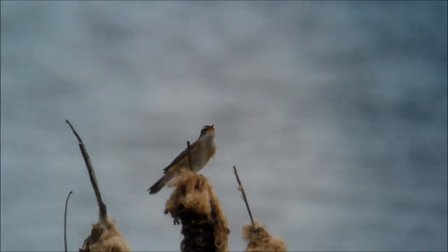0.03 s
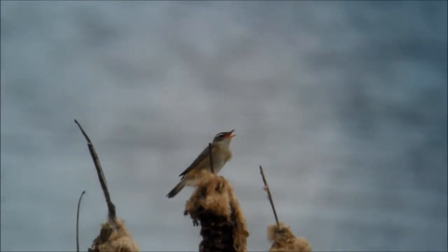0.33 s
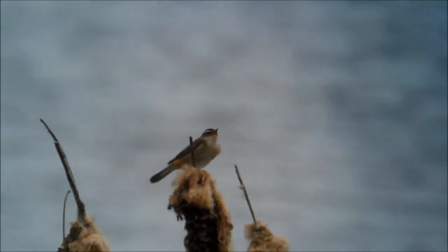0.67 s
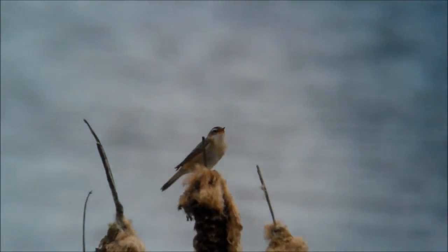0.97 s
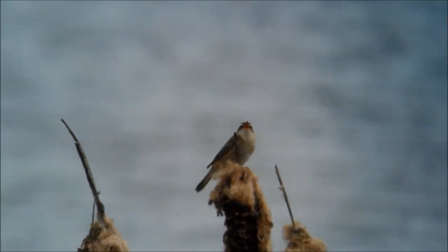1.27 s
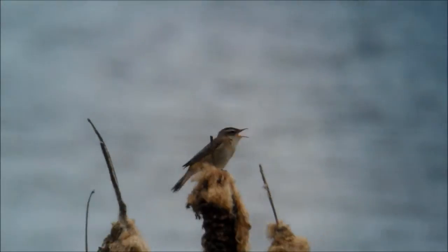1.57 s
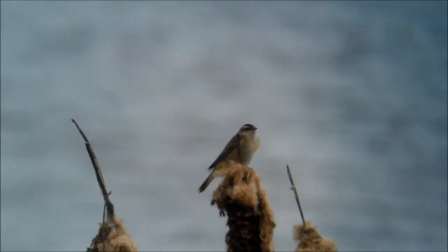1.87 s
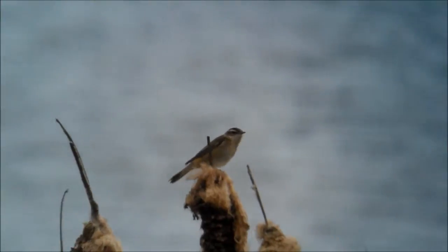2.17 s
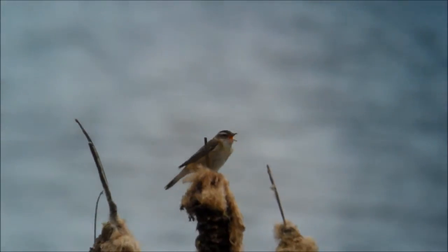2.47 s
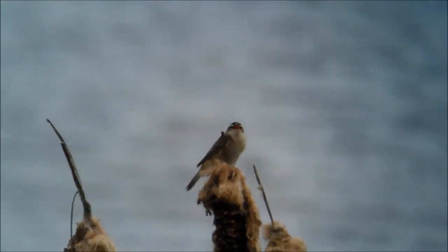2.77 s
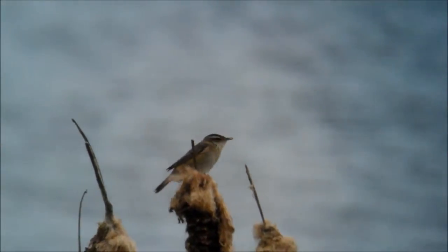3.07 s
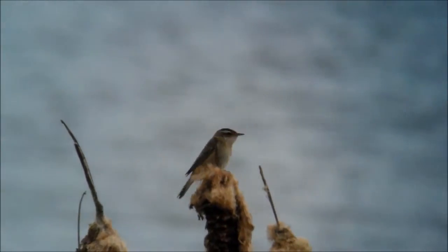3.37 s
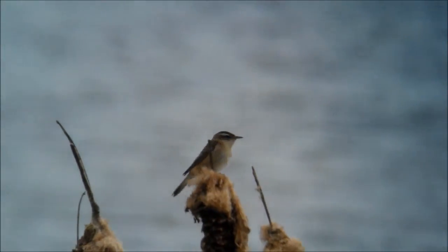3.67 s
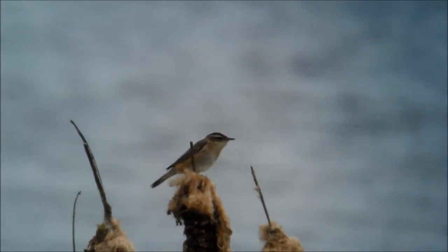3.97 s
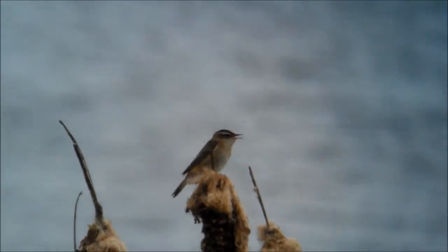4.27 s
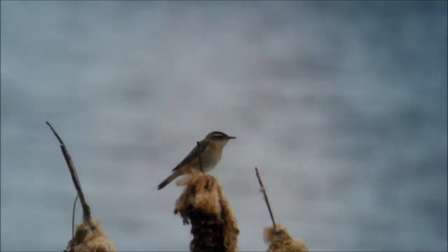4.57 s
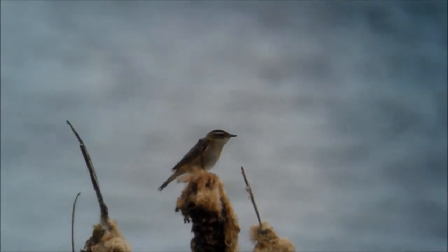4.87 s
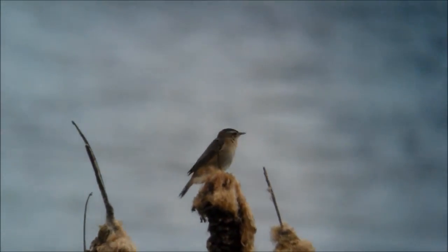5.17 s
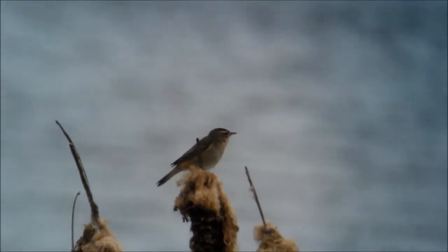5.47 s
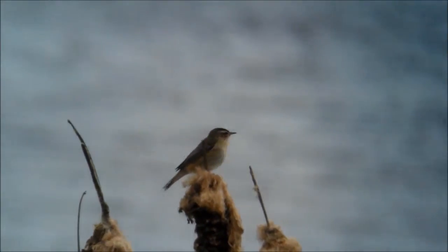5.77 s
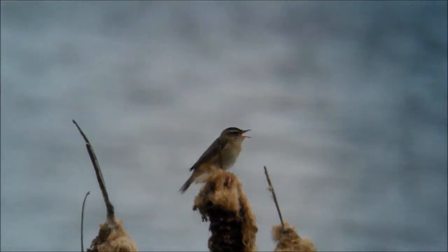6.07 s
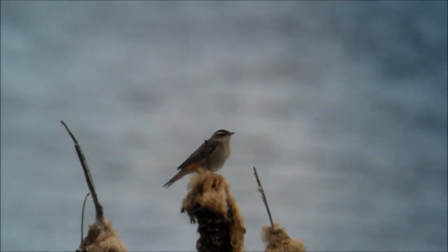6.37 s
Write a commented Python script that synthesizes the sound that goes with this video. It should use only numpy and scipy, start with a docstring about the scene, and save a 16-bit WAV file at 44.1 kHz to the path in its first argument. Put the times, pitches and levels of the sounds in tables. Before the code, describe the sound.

Outdoors by the water, a soft rush and microphone hiss run throughout, dipping for an instant now and then. A quick, distant trill opens, and a small bird in the reeds sings faint, raspy chips in quick groups. Two close, dull handling thumps stand out, followed by a light rub. The bird carries on, with a hoarse cry and lower calls far away, pauses, and chirps again near the end.

```python
"""Warbler in the reeds

A small warbler chatters faintly from a reed head over water: its syrinx gives scratchy chips in threes,
each set in a thin, buzzy slur. Further off are a quick trill, an arching cry and a few lower calls,
over a distant rush and microphone hiss that keep dipping for an instant.
Right at the microphone, a hand bumps the camera twice, then rubs and taps it lightly."""
import sys
import numpy as np
from scipy import signal
from scipy.fft import rfft, irfft
from scipy.io import wavfile
from scipy.ndimage import map_coordinates

SR = 44100
rng = np.random.default_rng(int(sys.argv[2]) if len(sys.argv) > 2 else 0)


def output_pcm(signal):
    """Save a mono or channel-first signal as 16-bit PCM at the path in sys.argv[1].

    Samples are clipped to [-1, 1] before scaling.
    """
    pcm = np.clip(np.atleast_2d(signal).T, -1, 1) * 32767
    wavfile.write(sys.argv[1], SR, np.round(pcm).astype(np.int16))


N = 283122

# the warbler's three-chip syllables: middle chip t/s, lowest throat resonance f/Hz, relative level/dB,
# upper resonances against the lowest/dB, swell per chip/dB
SYLLABLES = [(.680, 4790, -54.5, -5, 1.5), (.856, 4700, -56, -8, -5), (1.052, 4740, -55, -2.5, 3),
             (1.259, 4700, -57, -2, 1.5), (1.429, 4700, -61, -2.5, 4), (1.604, 4780, -56.5, -3.5, 2.5),
             (1.798, 4730, -62, -1.5, -4), (1.949, 4720, -60, -0.5, -3.5), (2.639, 4970, -55.5, 2.5, -1),
             (2.852, 4980, -59.5, 5, -1.5), (3.083, 5170, -61.5, 1, -3.5), (3.316, 5220, -59.5, 3, -2),
             (4.169, 5440, -62.5, 0, -0.5), (4.572, 4782, -60.5, -4, 1), (6.168, 4800, -65.5, 4, 0),
             (6.408, 4920, -67, 8, 3)]


def warbler_chips(length=.02, gap_s=.026, rise_share=.48, arch=.071, outer_db=-2.5, gain_db=-4.6):
    """Arching bursts of the syrinx: a ringing core under raspy resonances that an open bill lets out."""
    out, size = np.zeros(N), int(length * SR)
    shape = np.sin(np.pi / 2 * np.interp(np.arange(size) / size, [0, rise_share, 1], [0, 1, 0]))
    for s, hz, db, upper_db, swell_db in SYLLABLES:
        # pitch ratio, level/dB, pitch scatter
        resonances = [(1, 0, .033 * (1 + undb(upper_db))),
                      (1.13, upper_db, .0968), (1.37, upper_db - 5.5, .0968)]
        for place in (-1, 0, 1):
            chip_hz = hz * (1 + .022 * rng.standard_normal())  # no two chips quite alike
            burst = np.zeros(size)
            for ratio, part_db, scatter in resonances:
                pitch = chip_hz * ratio * (1 + arch * (shape - 1) + scatter * walk(1762, size))
                burst += undb(part_db) * sine(pitch)
            gain = undb(db + gain_db + place * swell_db + abs(place) * outer_db)
            add(out, s + place * gap_s - length * rise_share, gain * unit(shape ** 2) * burst)
    return out


def warbler_flanks(buzz=.72):
    """A faint, hoarse slur climbs into each syllable and another sinks away after it."""
    # t/s from the middle chip, length/s, start and end pitch ratios, offset to the syllable's level/dB
    flanks = [(-.1, 0.098, .95, 1.1, -23), (0.017, .11, 1, .97, -21)]
    table = []
    for s, hz, db, _, _ in SYLLABLES:
        for lag, length, start, end, flank_db in flanks:
            middle = (start + end) / 2
            table.append((s + lag, length, hz * start, hz * middle, hz * end, db + flank_db, buzz))
    return slurs(table)


def warbler_song():
    """Clearer slurred notes from the same reed head, among the chips."""
    # t/s, length/s, start f/Hz, middle f/Hz, end f/Hz, level/dB, buzz/0-1
    song = [(0, 0.094, 5120, 4700, 4350, -69, .38), (.44, .025, 5300, 5040, 4880, -69, .1),
            (.48, 0.16, 4050, 4650, 5240, -72, 0.3), (.72, 0.11, 5370, 5250, 4950, -71, 0.5),
            (.87, 0.056, 4400, 4080, 4100, -67, .36), (.928, 0.041, 4380, 4640, 4690, -69, .2),
            (.985, .06, 4950, 5250, 5400, -71, .38), (1.11, .09, 4950, 4800, 4600, -75, .42),
            (1.205, 0.055, 3143, 3480, 4150, -68.5, .2), (1.46, .05, 4900, 4850, 4800, -72, .2),
            (2.51, 0.038, 4980, 5080, 5540, -69, 0.25), (2.55, 0.084, 6100, 5620, 5350, -68.5, .1),
            (2.675, .11, 4670, 4070, 3980, -66, 0.3), (3.252, 0.054, 4000, 4310, 3982, -61.5, 0.2),
            (3.505, 0.026, 4950, 5300, 5550, -78, .15), (3.56, 0.036, 4780, 5100, 5700, -70.5, .15),
            (3.592, 0.065, 4950, 4630, 4250, -68, 0.4), (3.67, .08, 4100, 4600, 5100, -70, .7),
            (3.755, .06, 5030, 5170, 5600, -66, 0.39), (3.82, 0.1, 5200, 4980, 5040, -65.5, .53),
            (3.94, 0.29, 4840, 4700, 4500, -74, 0.54), (4.212, .036, 3320, 3210, 3130, -59, 0.43),
            (5.445, 0.04, 4920, 4660, 4620, -68.5, 0.24), (6.088, 0.042, 5230, 5150, 5050, -65, .3),
            (6.098, 0.069, 4610, 4680, 4680, -65, 0.4), (6.352, 0.027, 5950, 5820, 5900, -65, .45)]
    return slurs(song)


def slurs(table, jitter=.0866, taper=.23, patchy_db=3.5, flutter_hz=170, shimmer_db=4):
    """Wavering near-sine glides: the membrane's flutter makes them buzz, and strong buzz turns hoarse."""
    out = np.zeros(N)
    for s, length, start_hz, middle_hz, end_hz, db, buzz in table:
        size = int(length * SR)
        t = np.arange(size) / SR
        glide_hz = np.polyval(np.polyfit([0, .5, 1], [start_hz, middle_hz, end_hz], 2), t / length)
        flutter = sine(flutter_hz * (1 + .11 * walk(90, size)))
        waver = .0205 * walk(69.8, size)
        hoarseness = 2 * buzz * jitter * walk(900, size)
        pitch = glide_hz * (1 + buzz * (.078 * flutter + waver + hoarseness))
        shimmer = shimmer_db * buzz * (flutter + walk(122.8, size))
        swell = signal.windows.tukey(size, taper) * undb(shimmer + patchy_db * walk(65.4, size))
        add(out, s, undb(db) * unit(swell * sine(pitch)))
    return out


def far_trill(count=5, start_s=.02, period_s=.1008, pitch_hz=3880, sag_hz=125, level_db=-56):
    """A bird further off repeats a clear pip that falls away hoarsely into a softer, lower note."""
    table = []
    for k in range(count):
        tiring = (k / (count - 1)) ** 4  # the last syllable comes early, sinks and weakens
        s = start_s + k * period_s - .004 * tiring
        hz = pitch_hz - sag_hz * tiring
        db = level_db - 1.5 * tiring
        pip = (s, .043, .98 * hz, hz, .953 * hz, db, .13)
        hoarse_drop = (s + .024, .035, .98 * hz, .92 * hz, .89 * hz, db - 7, .6)
        soft_note = (s + .034, .062 * (1 - tiring / 2), hz, .995 * hz, .89 * hz, db - 10, .22)
        table += [pip, hoarse_drop, soft_note]
    return slurs(table, taper=.84, patchy_db=-2)


def far_cry(start_s=2.81, length=.32, end_ratio=.76, buzz=.5):
    """One hoarse, distant cry: its partials follow one arch, some heard only near the top."""
    # top of the arch f/Hz, level/dB, share of the cry's length heard/0-1
    partials = [(1160, -69.5, .45), (1906, -69.5, 1), (2035, -70, 0.77), (2270, -76, 0.81)]
    table = []
    for top_hz, db, share in partials:
        s = start_s + length * (1 - share) / 2
        foot_hz = top_hz * (1 - (1 - end_ratio) * share ** 2)
        table.append((s, length * share, foot_hz, top_hz, foot_hz, db, buzz))
    return slurs(table, jitter=.053, taper=1)


def far_calls(gain_db=-4.5):
    """A few lower, buzzy calls carry from across the water."""
    # t/s, length/s, start f/Hz, middle f/Hz, end f/Hz, relative level/dB, buzz/0-1
    calls = [(1.48, .17, 1880, 2000, 1990, -67.5, 0.4), (2.735, 0.076, 980, 1015, 1020, -60.5, 0.7),
             (3.44, .04, 1950, 1920, 1880, -64, .35), (4.215, 0.095, 1830, 1930, 1930, -63.5, 0.56)]
    return undb(gain_db) * slurs(calls, jitter=.042)


def reed_scatter(x, t60, wet_db):
    """The short tail that stems and bank scatter back to the microphone after every call."""
    t = np.arange(SR // 2) / SR
    tail = rng.standard_normal(len(t)) * np.exp(-np.log(1000) * t / t60)
    return undb(wet_db) * signal.fftconvolve(x, tail / np.linalg.norm(tail))[:N]


def camera_knocks(body_hz=235, body_width_hz=45, ring_db=-11, octave_db=-11.5, push_db=-35):
    """A touch, a rattle and a blow each rock the camera for a few swings; its body rings on briefly."""
    # t/s, blow f/Hz, blow level/dB, first touch against the blow/dB, lead of that touch/s
    knocks = [(2.0718, 253, -38.5, -34, .012), (2.1317, 250, -9.5, -12.5, 0.019),
              (2.234, 251, -26, -16.5, 0.013), (2.2907, 303, -12, -9.5, .0205),
              (2.401, 196, -46.5, -10, .02), (2.457, 230, -46, -2.5, .02), (2.512, 222, -45, -11, 0.0205),
              (2.556, 165.6, -48, -13, 0.03), (5.303, 155, -53.5, -18, 0.034)]
    out = np.zeros(N)
    for s, blow_hz, blow_db, touch_db, touch_lead in knocks:
        peak = undb(blow_db)
        # lead/s, f/Hz, swings, amplitude
        touch = (touch_lead, 235, 3.06, peak * undb(touch_db))
        rattle = (.0058, 1.474 * blow_hz, 4.6, peak ** 2 * undb(2.5))  # a hard knock chatters
        blow = (0, blow_hz, 2.5, peak)
        for lead, hz, swings, amplitude in (touch, rattle, blow):
            length = swings / hz
            t = np.arange(int(length * SR)) / SR
            swing = amplitude * np.hanning(len(t))
            phase = 2 * np.pi * hz * (t - length / 2)
            rocking = swing * (np.sin(phase) + undb(push_db))  # the hand also pushes one way
            octave = undb(octave_db) * swing ** 2 * np.sin(2 * phase)  # a hard contact stiffens
            add(out, s - lead - length / 2, rocking + octave)
    ring = signal.lfilter(*signal.iirpeak(body_hz, body_hz / body_width_hz, fs=SR), out)
    bass_cut = signal.butter(1, 45, "high", fs=SR, output="sos")  # the small microphone lacks deep bass
    return signal.sosfiltfilt(bass_cut, out + undb(ring_db) * ring)


def hand_rub(start_s=2.36, length=.244, band_hz=(115, 280), level_db=-65):
    """Skin drags over the camera body after the bumps, in a soft, low rustle."""
    out, size = np.zeros(N), int(length * SR)
    band = signal.butter(3, band_hz, "band", fs=SR, output="sos")
    drag = signal.sosfilt(band, rng.standard_normal(size))
    add(out, start_s, undb(level_db) * unit(drag * signal.windows.tukey(size, .4)))
    return out


def rush_and_hiss(level_db=-57, sway_db=1.44, split_hz=2500, bass_shelf_hz=150):
    """A low, distant rush sways a little under the even hiss of the microphone."""
    # noise spectrum: f/Hz, relative level/dB
    noise_floor = [(24, -15), (40, -24), (54, -33), (80, -28), (247, -5), (377, 0), (653, -4), (1020, -6),
                   (1380, -8), (1960, -11.5), (4130, -14), (4800, -12.5), (6320, -19.5), (10400, -16),
                   (15500, -17.5)]
    # broad humps and hollows in it: f/Hz, width/Hz, gain/dB
    humps = [(277, 107, 4), (942, 250, 3.5), (1920, 330, 2), (4930, 480, -1.5), (6960, 540, -3)]
    f = np.maximum(np.fft.rfftfreq(N, 1 / SR), 1)
    hz, db = np.transpose(noise_floor)
    colour_db = np.interp(np.log(f), np.log(hz), db)
    for centre_hz, width_hz, hump_db in humps:
        colour_db += hump_db * np.exp(-2 * ((f - centre_hz) / width_hz) ** 2)
    bass_shelf = 1 - .21 / (1 + (f / bass_shelf_hz) ** 4)
    spectrum = rfft(rng.standard_normal(N)) * undb(colour_db) * bass_shelf
    low_share = 1 / (1 + (f / split_hz) ** 2)
    sway = undb(sway_db * (walk(3.108, N) + walk(20, N)))
    rush = irfft(spectrum * low_share, N) * sway
    hiss = irfft(spectrum * (1 - low_share), N)
    return undb(level_db) * unit(rush + hiss)


def level_dips(x, crossovers_hz=(1100, 2600)):
    """The level dips briefly, deeply in the treble and only slightly in the bass."""
    # t/s, width/s, depth in the treble/dB
    dips = [(.851, 0.0083, 15), (.915, 0.01, 19.5), (1.013, 0.013, 12), (1.365, 0.015, 10),
            (1.493, 0.015, 6.5), (1.726, 0.012, 17), (1.803, 0.01, 9.5), (1.997, 0.011, 8.5),
            (2.12, 0.037, 29), (2.188, 0.022, 14.5), (2.3, 0.023, 20.5), (2.423, 0.015, 8.5),
            (2.581, 0.012, 14), (2.757, 0.022, 14), (2.935, 0.011, 12), (2.984, 0.0061, 15),
            (3.155, 0.0087, 15), (3.449, .012, 12), (3.597, 0.018, 9), (3.646, 0.013, 14),
            (3.774, 0.0074, 15), (3.981, 0.014, 13), (4.008, 0.01, 17), (4.285, 0.0089, 13),
            (4.616, 0.023, 18.5), (4.751, 0.028, 22), (4.905, 0.011, 11), (5.004, 0.012, 12),
            (5.111, .012, 12.5), (5.185, .012, 6), (5.229, 0.02, 10.5), (5.474, 0.011, 12),
            (5.651, 0.011, 12), (5.821, .01, 13), (5.865, 0.011, 13.5), (5.922, 0.011, 12.5),
            (6.371, 0.01, 12)]
    t = np.arange(N) / SR
    dip_db = np.zeros(N)
    for s, width, depth_db in dips:
        notch = np.exp(-np.minimum(2 * np.abs((t - s) / width) ** 2.4, 20))
        dip_db = np.maximum(dip_db, depth_db * notch)
    bass, under_treble = (signal.sosfiltfilt(signal.butter(3, hz, fs=SR, output="sos"), x)
                          for hz in crossovers_hz)
    middle, treble = under_treble - bass, x - under_treble
    return bass * undb(-.03 * dip_db) + middle * undb(-.43 * dip_db) + treble * undb(-dip_db)


def undb(db):
    """Decibels to gain."""
    return 10 ** (np.asarray(db) / 20)


def unit(x):
    """Scale to rms 1."""
    return x / np.sqrt(np.mean(x ** 2))


def sine(hz):
    """A sine that follows a pitch curve."""
    return np.sin(2 * np.pi * np.cumsum(hz) / SR)


def add(out, s, sound):
    """Mix a sound in from time s."""
    i = min(max(int(s * SR), 0), len(out))
    out[i:i + len(sound)] += sound[:len(out) - i]


def walk(rate_hz, size):
    """Smooth random wandering with a spread near 1."""
    steps = np.arange(size) * rate_hz / SR
    return map_coordinates(rng.standard_normal(size // 8 + 2), [steps], order=1)


def scene():
    """One microphone by the reeds: the warbler nearest, other birds beyond, a hand on the camera."""
    near = warbler_chips() + warbler_song() + warbler_flanks()
    far = far_trill() + far_calls() + far_cry()
    scattered = reed_scatter(near, t60=.17, wet_db=-2) + reed_scatter(far, t60=.83, wet_db=-4)
    background = level_dips(rush_and_hiss() + scattered)
    return (near + far + background + camera_knocks() + hand_rub())[None]


def record(dry, top_hz=15800):
    """The camera cuts the top treble steeply."""
    return signal.sosfilt(signal.ellip(10, .1, 70, top_hz, fs=SR, output="sos"), dry)


dry = scene()
out = record(dry)
output_pcm(out)
```